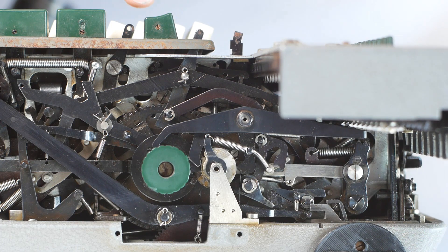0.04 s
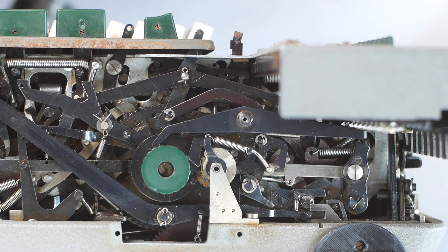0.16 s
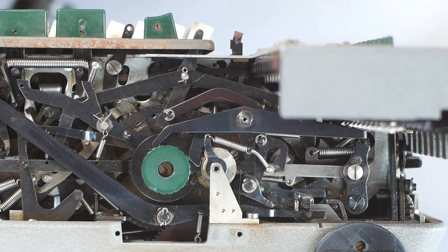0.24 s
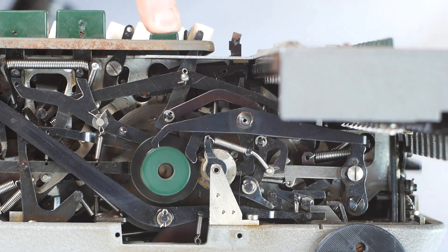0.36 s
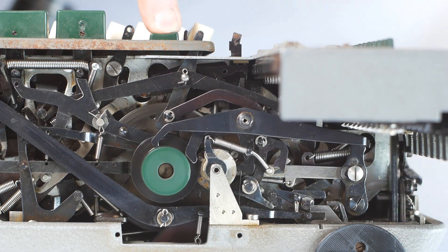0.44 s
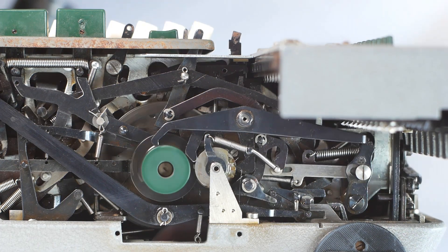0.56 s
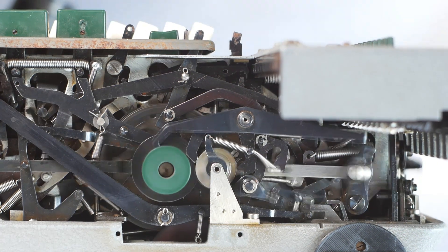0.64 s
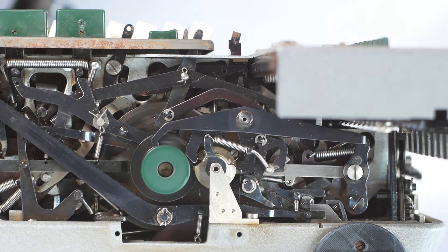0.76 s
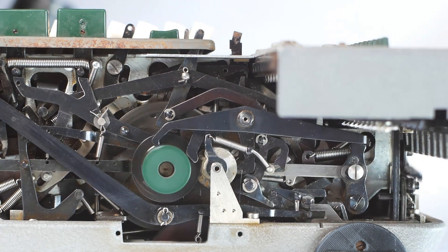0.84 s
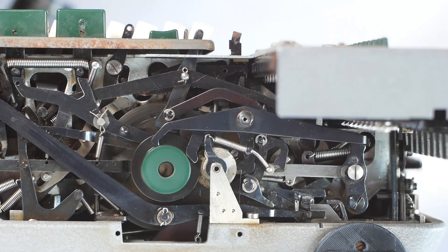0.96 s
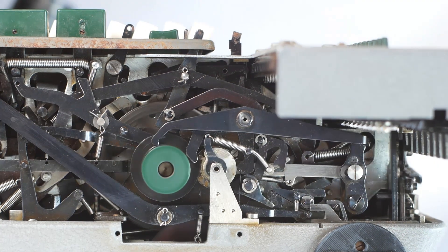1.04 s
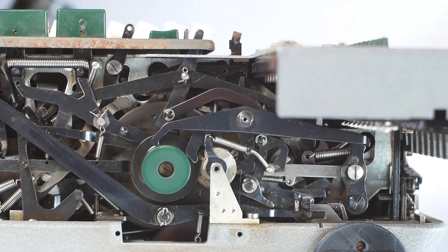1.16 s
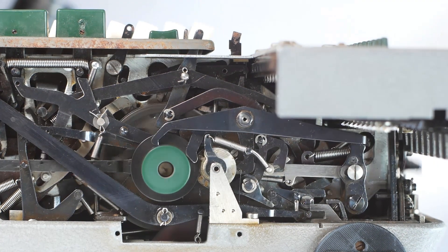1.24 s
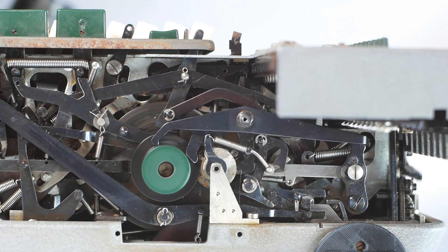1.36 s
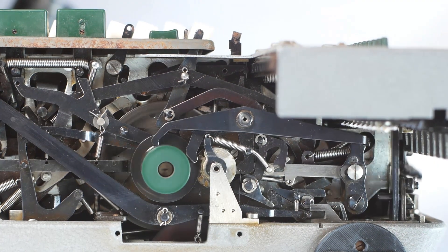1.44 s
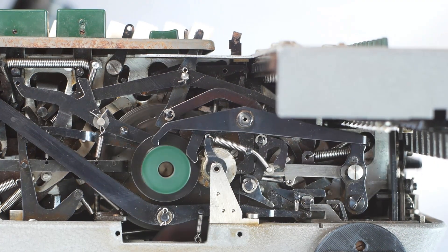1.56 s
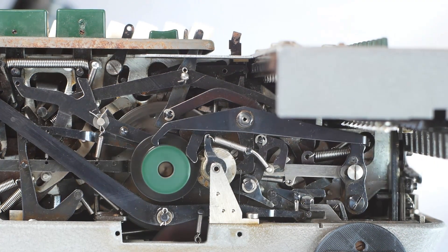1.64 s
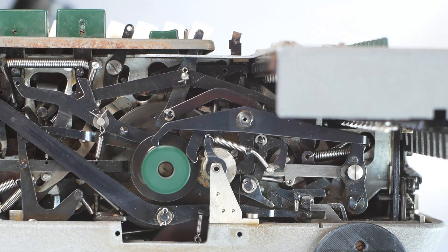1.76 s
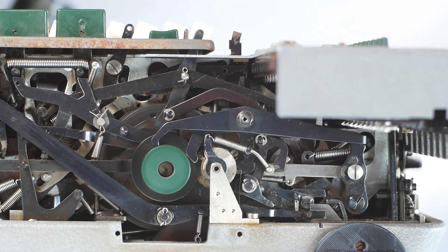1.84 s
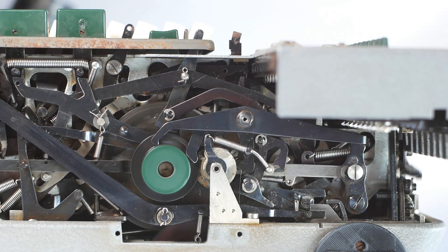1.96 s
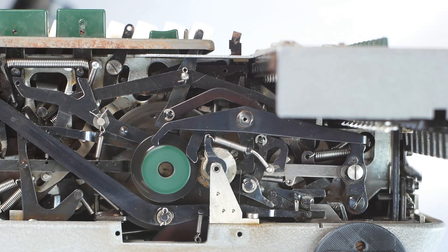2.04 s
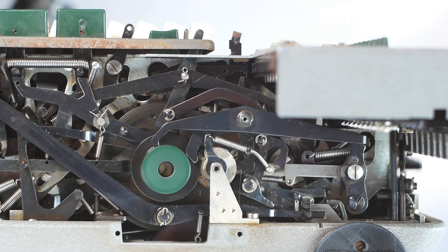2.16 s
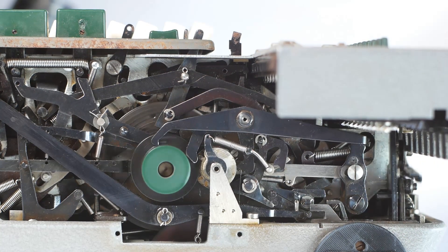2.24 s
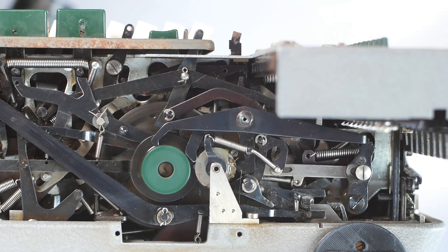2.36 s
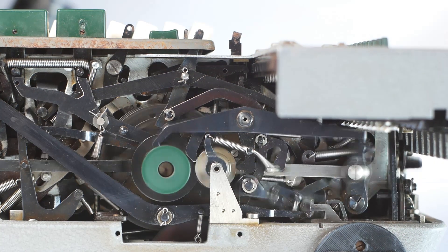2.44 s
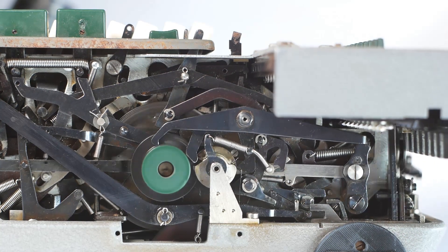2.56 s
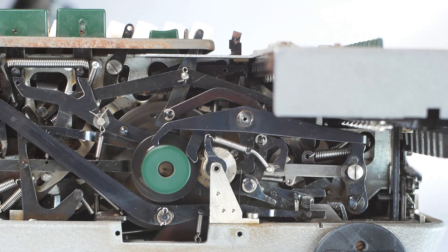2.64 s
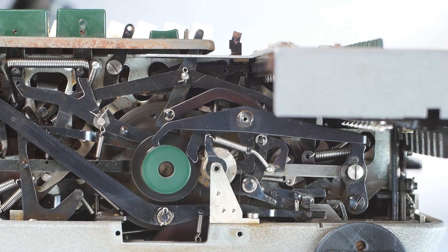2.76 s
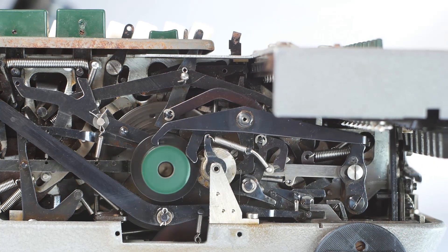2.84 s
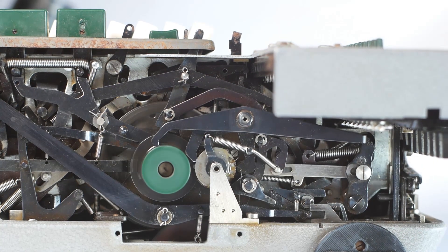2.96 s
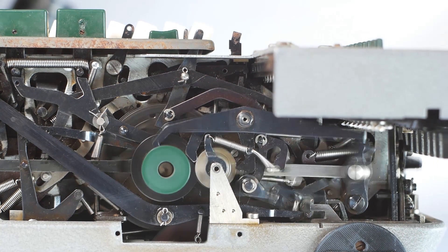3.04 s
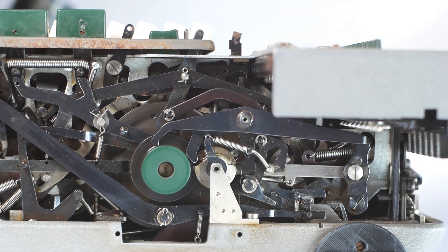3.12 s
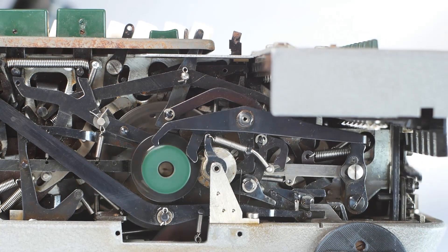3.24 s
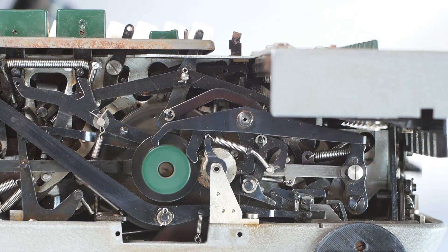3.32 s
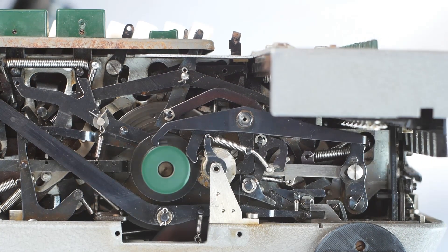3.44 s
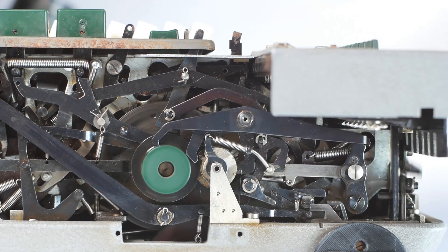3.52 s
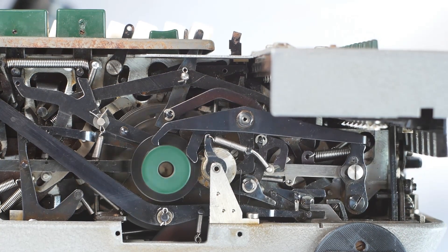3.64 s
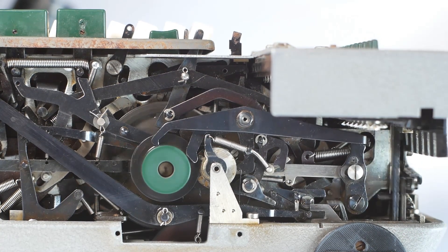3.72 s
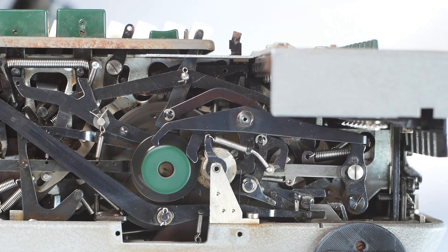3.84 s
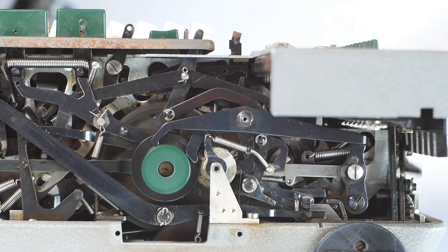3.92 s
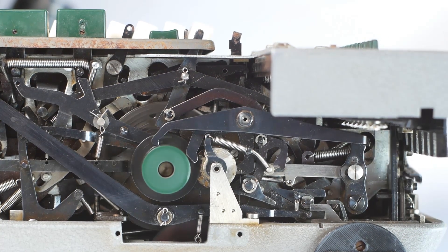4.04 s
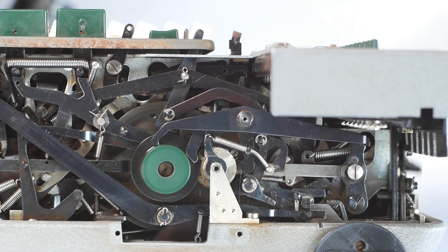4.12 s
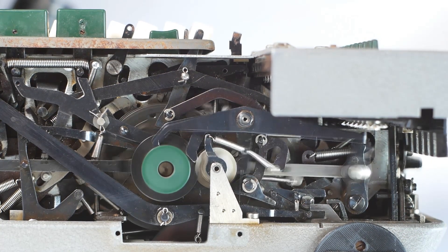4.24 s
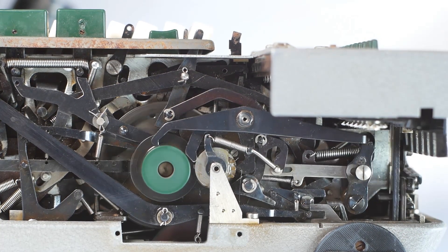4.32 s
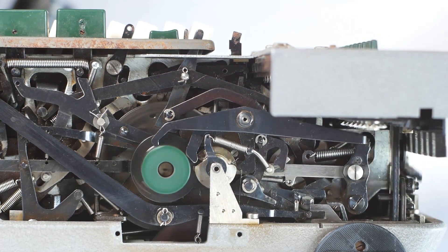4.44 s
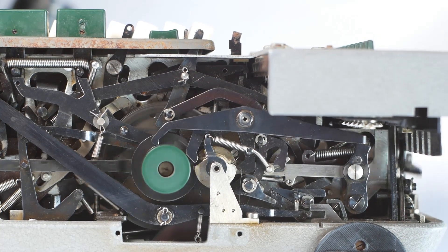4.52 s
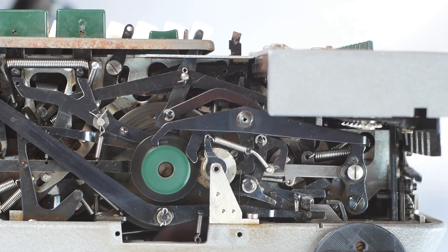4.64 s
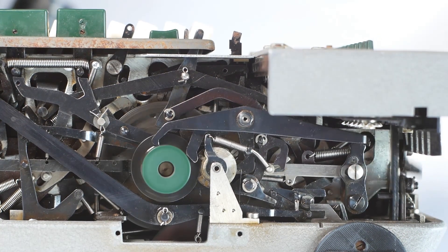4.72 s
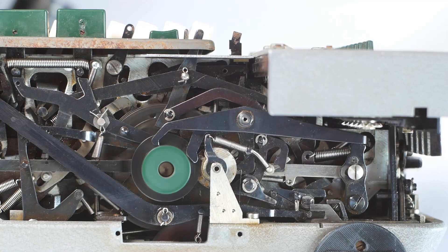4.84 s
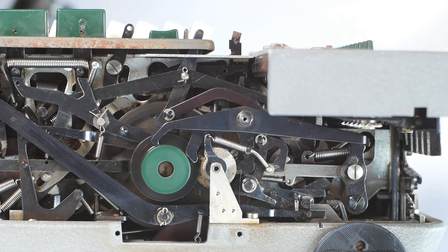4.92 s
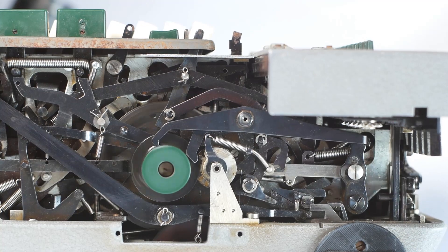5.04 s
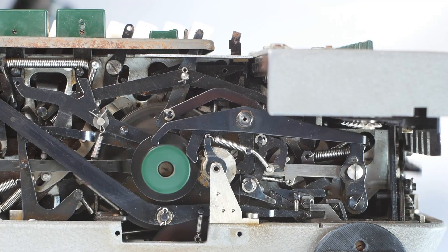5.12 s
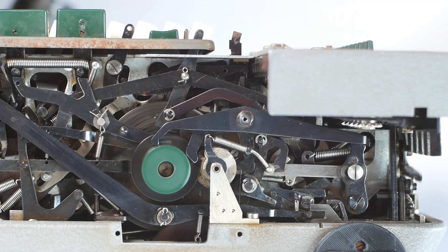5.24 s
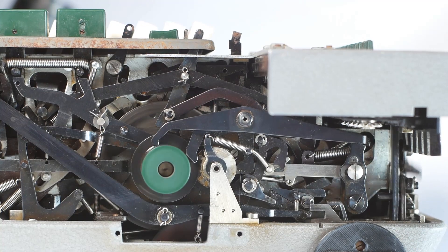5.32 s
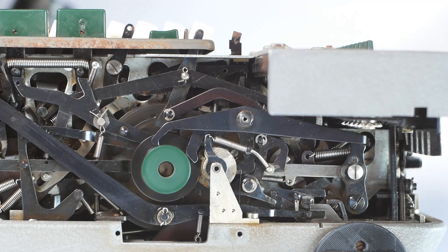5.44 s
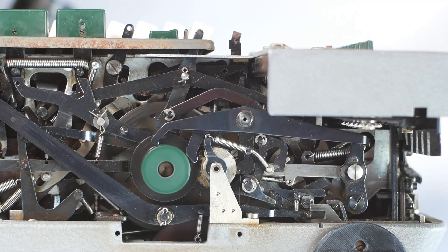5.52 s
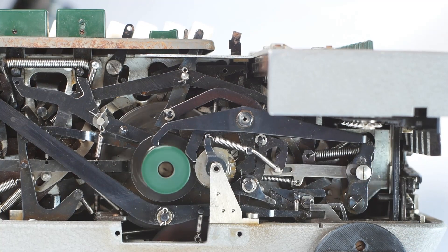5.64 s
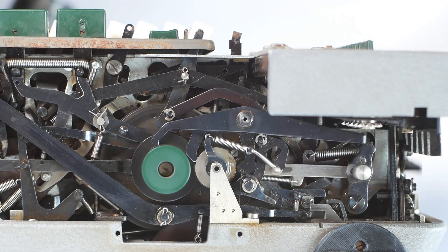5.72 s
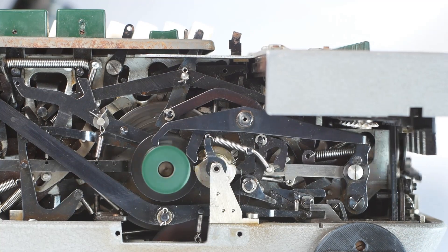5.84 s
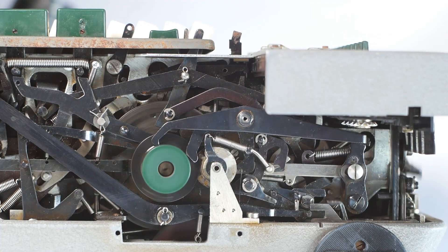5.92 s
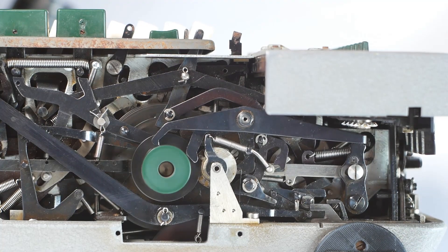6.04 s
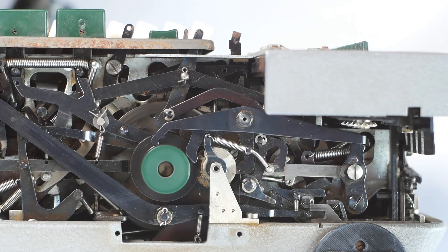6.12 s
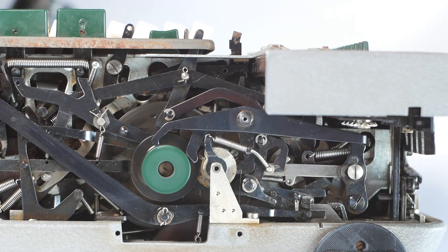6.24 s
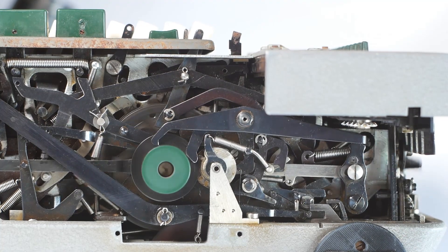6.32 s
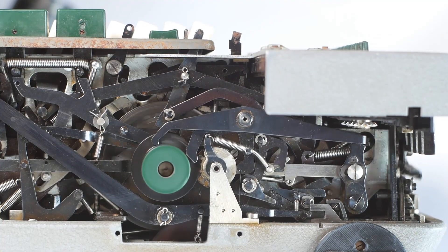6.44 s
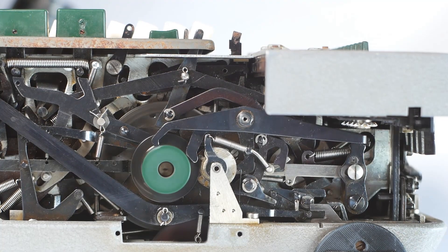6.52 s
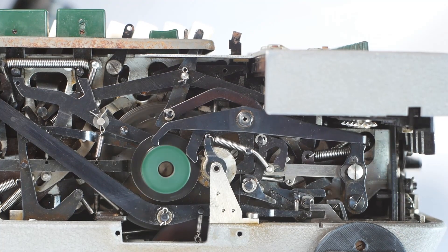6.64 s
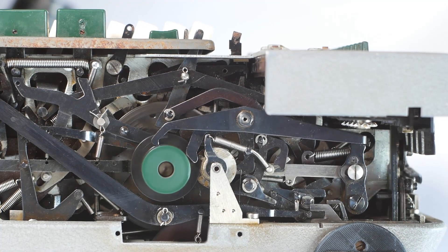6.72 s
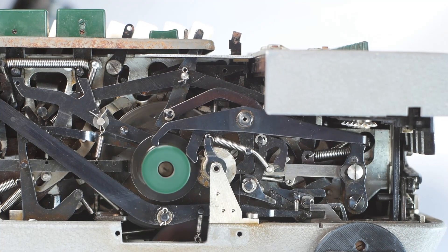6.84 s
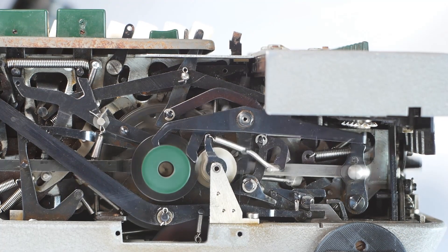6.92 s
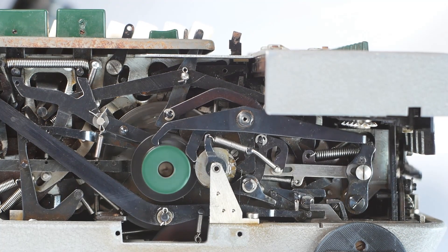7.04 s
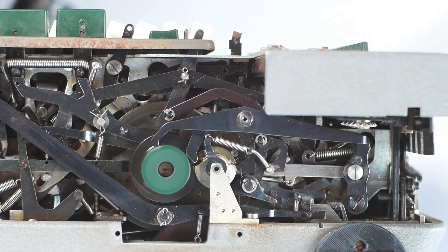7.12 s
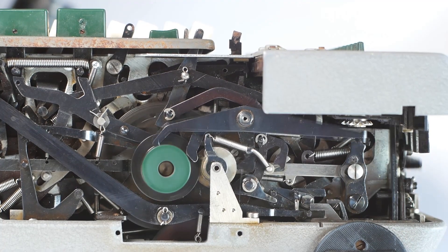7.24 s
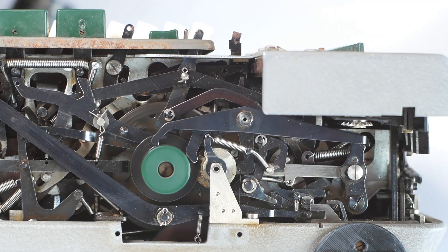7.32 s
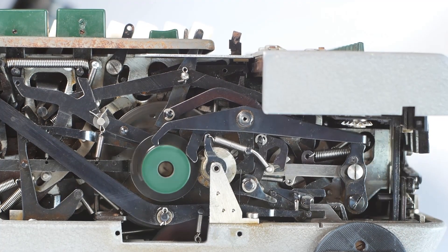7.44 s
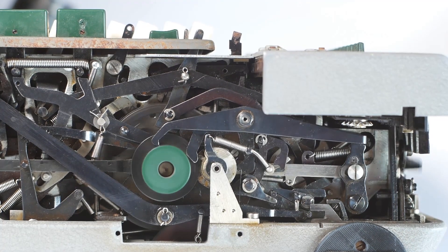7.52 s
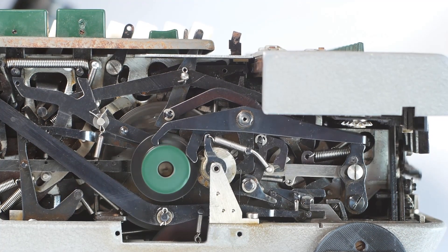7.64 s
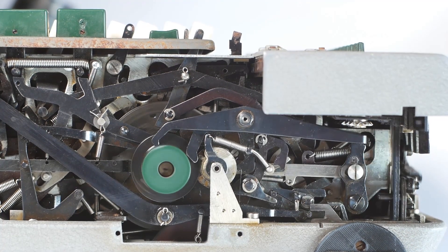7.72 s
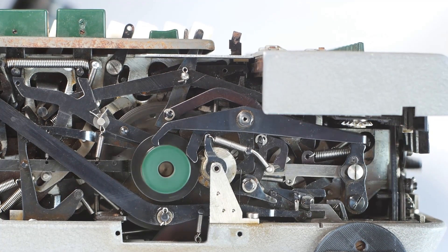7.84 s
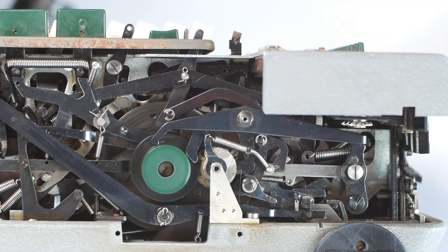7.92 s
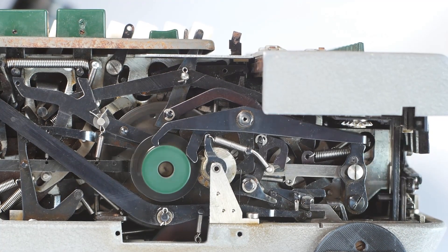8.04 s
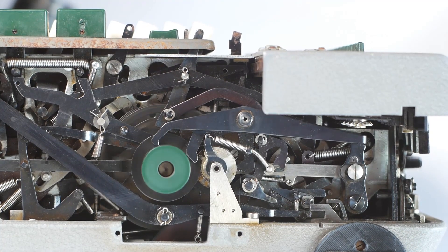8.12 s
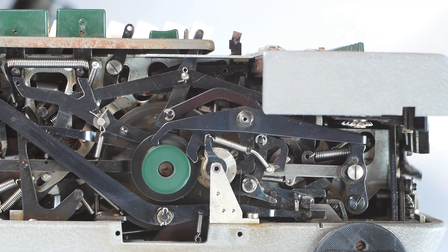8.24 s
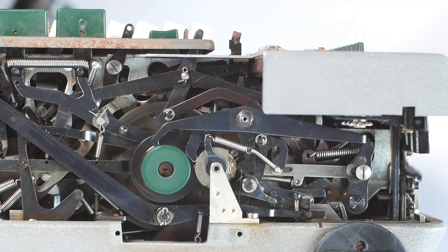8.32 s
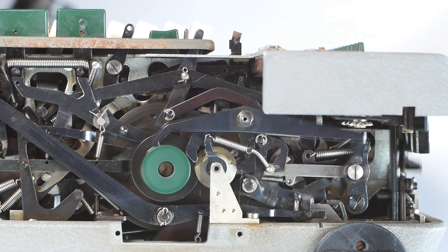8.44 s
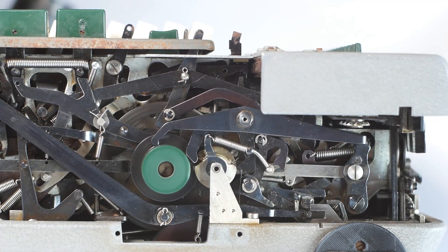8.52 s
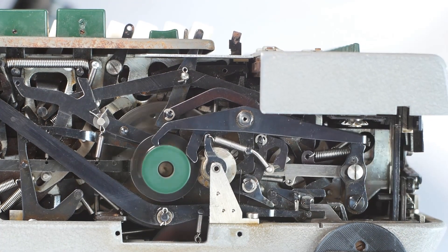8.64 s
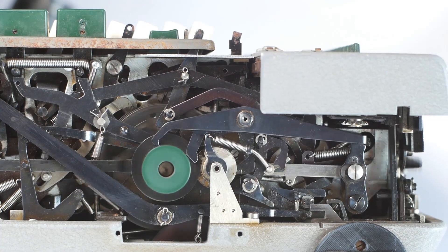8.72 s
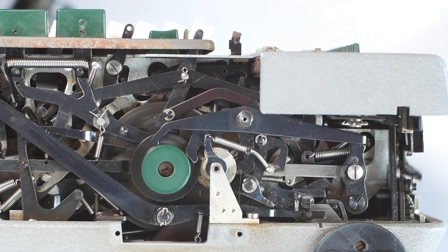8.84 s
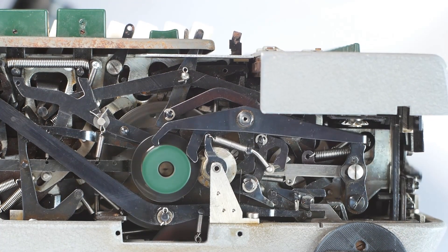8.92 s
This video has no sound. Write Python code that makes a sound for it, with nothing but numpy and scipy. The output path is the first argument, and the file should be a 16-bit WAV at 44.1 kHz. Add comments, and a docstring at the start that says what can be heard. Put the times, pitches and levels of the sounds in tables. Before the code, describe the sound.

A key is pressed on an open electromechanical calculator and its motor starts to whirr. Cams and steel levers clatter about seven times a second in bright, rattling clicks with short metallic rings. Roughly every second and a half the carriage clanks against its stop and latches with a tiny ratcheting click, then the clatter carries on. The stereo microphone is close, in a small quiet room.

```python
"""A small quiet room, close to a stereo microphone: a finger presses the key of an open calculator.
Its motor and gears whirr as many tiny contacts drive the resonances of the steel frame and levers.
About seven times a second cams, pawls and levers collide: each impact gives a bright rattle, a clack
and a thud, and struck parts ring in damped modes. At each shift the carriage clanks against its stop
and a spring finger clicks over teeth. Desk and walls add short reflections."""
import sys
import numpy as np
from scipy import signal
from scipy.fft import rfft, irfft, next_fast_len
from scipy.io import wavfile
from scipy.ndimage import uniform_filter1d

SR = 44100
rng = np.random.default_rng(int(sys.argv[2]) if len(sys.argv) > 2 else 0)


def wav_out(sig):
    """Save sig, one row per channel (or a flat mono array), as 16-bit PCM at SR to the path in sys.argv[1]."""
    wavfile.write(sys.argv[1], SR, np.round(np.clip(np.atleast_2d(sig).T, -1, 1) * 32767).astype(np.int16))


N = 395577

# Events of the mechanism. Each row: start in seconds, then rattle, clack and thud in relative dB.
STARTS = [(0.3824, -16, -33, -49), (0.4373, -20, -39.5, -38)]  # the key latches and the drive takes up
CLUTCHES = [(0.9424, -14.5, -35, -39.5), (2.1374, -16, -35, -42.5), (2.7347, -18.5, -37, -45),
            (3.3353, -16, -41, -42.5), (4.091, -16.5, -33, -40), (4.6842, -18.5, -39, -40.5),
            (5.4272, -15.5, -30.5, -38), (6.0287, -16, -38, -40), (6.77, -16.5, -36, -38),
            (7.3745, -18, -37, -45), (8.112, -14, -33, -40), (8.7178, -18.5, -37, -40)]  # the clutch bites at a digit's first turn and reverses at its last
WHEELS = [(1.1025, -18.5, -33, -44), (1.2538, -14.5, -30.5, -43), (1.396, -12.5, -27, -42),
          (1.5464, -10, -28, -40.5), (1.695, -9, -29.5, -43), (1.8424, -13.5, -27, -47),
          (1.9886, -12.5, -24, -44), (3.4894, -19, -37, -45), (3.6403, -20.5, -33, -42),
          (3.7983, -19, -30.5, -39), (3.944, -20, -34, -42), (4.8424, -16, -35, -41),
          (4.9907, -18, -32, -43), (5.1394, -16.5, -33, -42), (5.287, -17.5, -28.5, -42.5),
          (6.183, -17, -30, -47), (6.329, -16, -35, -49), (6.4757, -15.5, -30.5, -48),
          (6.6273, -18, -33, -46), (7.5328, -18.5, -35, -45), (7.6747, -18, -33, -40),
          (7.823, -15.5, -30, -42.5), (7.9754, -16.5, -32, -40), (8.88, -21, -38, -39)]  # number wheels spin up in the turns between
PAWLS = [(1, -14.5, -32, -43), (1.154, -9.5, -36, -49), (1.3061, -10, -34, -42), (1.4553, -11, -34, -41),
         (1.6056, -11.5, -39, -38), (1.7504, -9.5, -38, -38), (1.899, -12, -36, -45),
         (2.048, -13, -36, -55), (2.1993, -12.5, -33, -47), (2.796, -13.5, -32.5, -40),
         (3.395, -14, -42, -53), (3.544, -12, -37, -34), (3.693, -14, -33, -39), (3.8445, -10, -36, -46),
         (3.9966, -13, -33, -55), (4.1507, -13.5, -33, -36.5), (4.747, -16, -34, -41),
         (4.8964, -14, -36, -39), (5.0433, -12.5, -34, -34), (5.194, -10, -34, -35.5),
         (5.343, -13.5, -34, -39), (5.489, -10, -42, -42), (6.089, -13, -44, -36), (6.2335, -13, -35, -35),
         (6.3822, -13, -34, -38), (6.529, -11.5, -45, -55), (6.6802, -13.5, -34, -35),
         (6.833, -13, -46, -53), (7.431, -12, -42, -40), (7.583, -13, -33, -39), (7.729, -12.5, -36, -42),
         (7.878, -12.5, -38, -39), (8.029, -13.5, -29.5, -36.5), (8.176, -12, -35, -38),
         (8.779, -11.5, -46, -39), (8.934, -11.5, -39, -37)]  # the counter pawl drops once a turn
RETURNS = [(1.0364, -12, -40, -50), (1.1407, -15, -38, -41), (1.1864, -10, -42, -55), (1.34, -9, -32, -42),
           (1.3775, -17, -33, -37), (1.4884, -11, -32, -50), (1.6434, -16, -32, -46), (1.677, -9, -32, -29),
           (1.7777, -13, -38, -41), (1.822, -28, -35, -31), (1.933, -13, -38, -51), (2.0804, -26, -35, -52),
           (2.8284, -13, -37, -39), (2.883, -24, -43, -50), (3.476, -22, -33, -50), (3.62, -18, -36, -55),
           (3.704, -20, -36, -50), (3.7276, -10, -36, -39), (3.873, -9, -34, -52), (4.0304, -23, -40, -53),
           (4.778, -11, -33, -45), (4.9295, -14, -30, -45), (5.0744, -11, -31, -37), (5.224, -12, -37, -44),
           (5.374, -10, -28.5, -44), (5.5174, -9, -39, -40), (6.1244, -14, -31, -47),
           (6.267, -15, -41, -42), (6.4204, -19, -39, -37), (6.565, -12, -34, -51),
           (6.7176, -13, -30.5, -47), (7.537, -9, -30, -45), (7.6143, -9, -33, -37), (7.758, -10, -31, -38),
           (7.9125, -15, -38, -35.5), (8.0524, -11, -31, -45), (8.8103, -13, -37, -50),
           (8.9574, -18, -42, -38)]  # a loose lever knocks, mostly falling back after the pawl
ADD_BACKS = [(0.4967, -16, -29.5, -41.5), (2.2916, -15, -33, -40.5), (2.8953, -15.5, -30.5, -39),
             (4.2462, -14.5, -28, -41), (5.5817, -15.5, -32, -39), (6.9288, -16, -31.5, -40.5),
             (8.2782, -15, -31, -36.5)]  # the overdrawn amount is added back
SHIFTS = [(0.6414, -12.5, -33.5, -48), (2.4413, -13, -33, -44), (3.048, -14.5, -33, -50),
          (4.4022, -9.5, -33, -42.5), (5.7379, -11.5, -34, -39), (7.0815, -15, -33.5, -45),
          (8.4276, -12, -33, -53)]  # the carriage is released and slides one place
STOPS = [(0.6944, -14, -20.5, -36), (2.489, -13, -20.5, -38), (3.089, -13, -20.5, -34),
         (4.4434, -14.5, -21.5, -42), (5.783, -12.5, -22.5, -42), (7.1247, -12, -22, -36),
         (8.4694, -11.5, -21.5, -34)]  # it hits its stop
LATCHES = [(0.837, -15.5, -33.5, -48), (2.6326, -16, -36.5, -54), (3.2303, -15, -35.5, -51),
           (4.583, -15.5, -37.5, -39), (5.924, -18, -35, -43), (7.2665, -16.5, -34, -46),
           (8.613, -16, -33, -37.5)]  # it latches before the next digit
# The blows within one event of each kind. Each row: offset in seconds, then rattle, clack and thud
# in dB against the event, nominal 60 dB decay time in seconds.
START_BLOWS = [(-.0155, -17, -14, -27, .04), (-.008, -11, -3, -12, 0.22), (.006, -6, -2, -12, 0.05)]
CLUTCH_BLOWS = [(0, -3, 1.5, 3.5, 0.2), (0.031, -8.5, -1, -1, 0.14), (0.049, -13.5, -9, -7, .2)]
WHEEL_BLOWS = [(-.011, -9.5, -10, 0.5, 0.044), (0, -8, -3.5, 3, 0.27)]
PAWL_BLOWS = [(-.009, -15, 1.5, -1.5, 0.062), (-.0003, -3, -8.5, -5, 0.027), (.0012, -11, -8, -10, 0.075),
              (.007, -20.5, -13, -4.5, 0.25)]
RETURN_BLOWS = [(0.00013, -17.5, -0.08, 0, 0.084)]
ADD_BACK_BLOWS = [(-.016, -13.5, -5, -15, 0.08), (0, -3.5, 0, 4.5, 0.18), (0.028, -2, -4, 3.5, 0.16),
                  (.044, -3, -2, 4, 0.21), (.090, -4, -5, -27, .13), (0.124, -16.5, -40, -8.5, 0.75)]
SHIFT_BLOWS = [(0, -8.5, -0.57, 3.6, 0.23), (0.027, -10, -0.78, 8.1, 0.3)]
STOP_BLOWS = [(-.010, -11, -15, -2, 0.12), (.001, -3.5, -13, -4.5, 0.11), (.013, -7.5, -13, -1, .13)]
LATCH_BLOWS = [(-.048, -25, -5, -7.5, 0.48), (0, -6, 2, 2, 0.19), (0.013, -6, -12, -13, 0.27),
               (0.032, -25, -19, 6, .04)]
# Adding racks strike and the carriage bounces on its stop. Each row: start in seconds, peak in dB.
CLANKS = [(.5035, -20), (.5415, -19), (.6867, -18), (.6959, -14), (.6986, -18), (.7045, -20), (2.298, -21),
          (2.3362, -17), (2.338, -15), (2.3405, -19), (2.4816, -21), (2.4894, -14), (2.4931, -17),
          (2.4968, -13), (2.499, -17), (2.9379, -19), (2.9424, -16), (3.0886, -18), (3.0928, -7),
          (3.0962, -14), (3.1031, -20), (4.2884, -16), (4.2912, -21), (4.4335, -19), (4.4433, -16),
          (4.4465, -17), (4.4487, -15), (5.5847, -16), (5.6121, -19), (5.7671, -21), (5.7745, -21),
          (5.7835, -16), (5.7882, -18), (5.7904, -18), (6.9709, -17), (6.973, -19), (6.9801, -19),
          (7.11, -19), (7.1166, -18), (7.1272, -14), (7.1304, -16), (8.3205, -17), (8.3234, -16),
          (8.3269, -16), (8.4625, -21), (8.4729, -11), (8.4764, -15), (8.479, -17), (8.4847, -18)]
# Single modes that ring out. Each row: start in seconds, frequency in Hz, level in dB.
LEVER_RINGS = [(0.529, 3340, -34), (0.687, 2790, -29), (1.182, 2756, -34), (1.374, 2690, -34),
               (1.399, 2500, -30), (1.549, 2580, -35), (1.636, 2730, -41), (1.694, 2070, -39),
               (1.818, 2760, -35), (1.97, 2720, -39), (1.998, 2660, -45), (2.135, 2440, -31),
               (2.136, 1830, -29.5), (2.287, 2700, -39), (2.292, 4400, -37), (2.327, 2090, -35),
               (2.33, 2320, -34), (2.482, 2010, -29.5), (2.487, 1003, -36), (2.893, 2670, -40),
               (2.936, 2540, -36), (2.938, 2920, -35), (3.094, 3740, -36), (3.642, 2770, -37),
               (3.828, 2600, -34), (4.086, 2460, -30), (4.096, 1696, -30), (4.27, 2060, -40),
               (4.42, 1706, -34), (4.43, 3420, -32), (4.432, 3930, -37), (4.924, 1810, -35),
               (4.929, 2636, -34), (5.286, 2820, -33), (5.602, 2550, -38), (5.607, 2040, -30),
               (5.777, 3110, -28), (5.782, 2080, -40), (5.785, 2540, -39), (6.112, 2740, -35),
               (6.181, 2740, -32), (6.416, 2720, -36), (6.458, 2730, -35), (6.485, 4340, -36),
               (6.484, 2760, -42), (6.631, 2680, -34), (6.68, 2720, -33), (6.707, 2720, -40),
               (6.77, 2760, -38), (6.959, 3980, -34), (6.967, 2110, -32), (7.121, 2070, -30),
               (7.246, 2670, -35), (7.378, 2780, -38), (7.531, 1680, -35), (7.535, 2060, -37),
               (7.659, 2700, -39), (7.777, 2710, -36), (7.942, 2700, -30.5), (8.117, 2800, -37),
               (8.271, 2670, -55), (8.319, 2310, -36), (8.362, 2700, -35), (8.461, 3700, -28),
               (8.605, 2680, -37), (8.803, 2740, -36), (8.91, 2710, -33)]
FRAME_KNOCKS = [(0.403, 509, -37), (.417, 492, -33.5), (.454, 493, -36), (.5, 513, -37), (1.265, 490, -37),
                (1.3, 497, -43), (1.571, 500, -38), (1.973, 503, -34), (2.138, 520, -39), (2.335, 654, -37),
                (2.345, 825, -46), (2.938, 634, -38), (2.95, 810, -43), (3.804, 496, -37),
                (3.829, 503, -39), (4.29, 620, -38), (4.3, 820, -40), (4.445, 634, -41), (5.635, 620, -36),
                (5.672, 465, -45), (5.78, 616, -44), (6.188, 489, -35), (6.488, 498, -38),
                (6.977, 634, -34), (8.284, 490, -40), (8.325, 601, -34), (8.363, 490, -35),
                (8.76, 510, -34)]
# A spring finger skips over four teeth as the carriage latches.
# Each row: start in seconds, time between teeth in seconds, nominal peak in dB.
RATCHETS = [(0.837, 0.0057, -9.5), (2.632, 0.0046, -9.5), (3.232, 0.0047, -11), (4.5852, 0.0055, -9),
            (5.9256, 0.0045, -8.5), (7.268, 0.0042, -9.5), (8.616, 0.0043, -10)]
TEETH_DB = [-3, -2, -3, -3]  # each entry: one tooth's offset in dB
# The spring finger snaps as the carriage is released. Each row: start in seconds, nominal peak in dB.
SNAPS = [(0.6426, -16), (3.0502, -9), (4.4032, -20), (5.741, -12), (7.0823, -13), (8.4312, -18)]
# Motor and gears. Each row: time in seconds, then tooth hiss, low hum, frame drone and lever ringing
# in relative dB.
WHIRR_LEVELS = [(.349, -39, -72, -77, -81), (.364, -44, -73, -78, -63), (.378, -35, -57, -57, -52),
                (0.404, -28, -55, -44, -39), (.5, -32.5, -57, -51, -65), (.7, -32, -52, -45, -43.5),
                (1.3, -32.5, -57, -52.5, -42), (2.3, -30.5, -49, -45, -41.5),
                (3.7, -32, -52.5, -49.5, -42.5), (4.4, -31.5, -54, -49, -42), (6.399, -31, -55, -47.5, -41),
                (7.3, -31.5, -51.5, -46.5, -41), (8.97, -32, -53, -52.5, -41.5)]
# Finger on the key. Each row: start in seconds, frequency and bandwidth in Hz, level in dB,
# 60 dB decay time in seconds.
KEY_TOUCHES = [(.054, 3860, 260, -66, 0.15), (.07, 800, 50, -64, 0.5), (.135, 810, 60, -62, .3)]

# Resonances of the steel parts. Each row: frequency in Hz, bandwidth in Hz, relative level in dB.
FRAME_MODES = [(170, 26, -2), (259, 14, 1.5), (356, 30, -7), (394, 28, -3), (500, 28, 0), (646, 48, -1),
               (820, 42, -3), (1036, 55, -4)]
LEVER_MODES = [(1312, 40, -3), (1390, 40, -2), (1690, 70, -3), (1815, 50, -2), (1902, 45, 0),
               (2080, 110, -2), (2225, 90, 0), (2735, 105, 4), (3070, 90, -4), (4330, 200, -5)]
CARRIAGE_MODES = [(1720, 220, -7), (2100, 230, 0), (2350, 260, -1), (2650, 260, -1), (3050, 280, -1),
                  (3750, 260, -3)]
PAWL_MODES = [(3260, 200, 1), (4580, 180, -3), (5300, 200, 2), (5700, 200, 1)]
SPRING_MODES = [(9600, 500, 0), (11200, 600, 0), (13000, 700, -9), (6500, 900, -9)]
# Spectral envelopes. Each row: frequency in Hz, relative level in dB.
RATTLE_SPECTRUM = [(1500, -51), (3500, -8), (5000, -3), (7000, -2.5), (9000, 4.5), (10500, 5.5),
                   (12500, -8), (15000, -15), (16500, -35)]
CLACK_SPECTRUM = [(500, -22.5), (1000, -3.5), (2200, 4), (2900, 2.5), (3600, -7), (6000, -30)]
GEAR_SPECTRUM = [(40, 4), (310, -9.5), (600, -5), (710, -3), (850, 1.5), (1200, 0.5), (2700, 3),
                 (3560, -0.5), (7900, 1), (9700, 6.5), (14100, -15), (16000, -26)]
SIDE_SPECTRUM = [(60, 0), (140, 7), (230, -3), (600, -9.5), (1300, -8.5), (2400, -13.5), (8000, -10),
                 (15000, -5)]  # reflections in the stereo side signal
AIR_SPECTRUM = [(30, 7), (200, 1.5), (850, -3), (2450, -4), (2620, 1), (2900, -11.5), (10000, -18.5),
                (16000, -30)]


def mechanism():
    """Impact excitation: one shower of contacts drives small parts, levers, frame and desk."""
    shower = contacts(per_s=6000, spread_db=2.0)
    hard = np.array([round(s * SR) for s, *_, t60 in all_blows() if t60 < .07])
    shower[hard], shower[hard + 2] = 2.0, -1.8  # steel meets steel and rebounds: a bright tick
    shake = shower * blow_envelope("rattle", rise_s=0.001, linger=0.73)
    push = shower * blow_envelope("clack", rise_s=0.0015, linger=0.93)
    jolt = shower * blow_envelope("thud", rise_s=0.0027, linger=1.0)
    rattle = gain_of(-3) * coloured(shake, RATTLE_SPECTRUM)
    clack = gain_of(-1) * coloured(push, CLACK_SPECTRUM) + gain_of(-28) * resonate(push, LEVER_MODES)
    desk = signal.lfilter(*signal.butter(1, 240, fs=SR), jolt)  # the desk top yields with a dull bump
    thud = gain_of(-1) * resonate(jolt, FRAME_MODES[2:]) + gain_of(3.5) * desk
    return rattle + clack + gain_of(-16) * lever_pings() + thud


def all_blows():
    """Each event is a series of impacts, given as start in seconds, levels in dB, decay in seconds."""
    kinds = [(STARTS, START_BLOWS), (CLUTCHES, CLUTCH_BLOWS), (WHEELS, WHEEL_BLOWS),
             (PAWLS, PAWL_BLOWS), (RETURNS, RETURN_BLOWS), (ADD_BACKS, ADD_BACK_BLOWS),
             (SHIFTS, SHIFT_BLOWS), (STOPS, STOP_BLOWS), (LATCHES, LATCH_BLOWS)]
    return [(s + offset, dict(zip(("rattle", "clack", "thud"), np.add(event_db, blow_db))), t60)
            for events, blows in kinds
            for s, *event_db in events
            for offset, *blow_db, t60 in blows]


def blow_envelope(layer, rise_s, linger):
    """Incoherent sources add in power: vibration builds up to each blow, then decays exponentially."""
    power, lead = np.zeros(N + SR), 400
    for s, levels_db, nominal_t60 in all_blows():
        t60 = np.clip(nominal_t60 * linger, .01, .5)
        t = np.arange(-lead, round(t60 * SR)) / SR
        envelope = np.where(t < 0, np.exp(t / rise_s), gain_of(-60 * t / t60))
        power[round(s * SR) - lead:][:len(t)] += (gain_of(levels_db[layer]) * envelope) ** 2
    return np.sqrt(power[:N])


def lever_pings():
    """The point of impact sets the modal balance, so each blow rings the levers in its own mix."""
    t, out = np.arange(3000) / SR, np.zeros(N + 3000)
    for s, levels_db, _ in all_blows():
        mix, detune = rng.standard_normal((2, len(LEVER_MODES)))
        ring = sum(gain_of(db + 2.0 * m) * damped_sine(t, hz * (1 + 0.039 * d), width)
                   for (hz, width, db), m, d in zip(LEVER_MODES, mix, detune))
        out[round(s * SR):][:len(t)] += gain_of(levels_db["clack"]) * ring
    return out[:N]


def struck_parts():
    """Free vibration after impact: the carriage clanks, the pawl pings, levers and frame ring out."""
    sounds = [(s, gain_of(db) * strike(CARRIAGE_MODES, spread_db=3.5)) for s, db in CLANKS]
    sounds += [(s, gain_of(db - 13.5) * strike(PAWL_MODES, spread_db=3.0)) for s, db, *_ in PAWLS]
    sounds += [(s, gain_of(db) * loose_mode(hz, rise_s=.0037, t60=.11, looseness=.35))
               for s, hz, db in LEVER_RINGS]
    sounds += [(s, gain_of(db) * loose_mode(hz, rise_s=.006, t60=.17, looseness=.15))
               for s, hz, db in FRAME_KNOCKS]
    out = np.zeros(N + SR)
    for s, sound in sounds:
        out[round(s * SR):][:len(sound)] += sound
    return out[:N]


def strike(modes, spread_db):
    """Modal superposition: one blow excites damped modes in a random mix; peak 1."""
    t = np.arange(2000) / SR
    ring = sum(gain_of(db + spread_db * rng.standard_normal())
               * damped_sine(t, hz * rng.uniform(.98, 1.02), width) for hz, width, db in modes)
    ring *= 1 - np.exp(-t / .00025)  # a soft first cycle
    return ring / abs(ring).max()


def loose_mode(hz, rise_s, t60, looseness):
    """A chattering mount modulates the amplitude and phase of one mode as it swells and decays."""
    t = np.arange(6000) / SR
    fade = (1 - np.exp(-t / rise_s)) * gain_of(-60 * t / t60)
    flutter, jitter = looseness * unit_rms(uniform_filter1d(rng.standard_normal((2, len(t))), 260))
    phase = 2 * np.pi * (hz * t + rng.random()) + jitter
    return fade / fade.max() * (1 + .5 * flutter) * np.sin(phase)


def ratchet():
    """Heavily damped high modes make the spring finger click, in an even run or a single snap."""
    t, out = np.arange(400) / SR, np.zeros(N)
    teeth = [(s + k * gap, db + tooth_db)
             for s, gap, db in RATCHETS for k, tooth_db in enumerate(TEETH_DB)]
    for s, db in teeth + SNAPS:
        click = sum(gain_of(mode_db) * width * t * damped_sine(t, hz * rng.uniform(1, 1.05), 2 * width)
                    for hz, width, mode_db in SPRING_MODES)
        click /= abs(click).max()
        out[round(s * SR):][:len(t)] += gain_of(db + 2 * rng.standard_normal()) * click
    return out


def motor():
    """Forced vibration: gear teeth and brushes hiss and shake the frame; loose knocks ring the levers."""
    t = np.arange(N) / SR
    times, *levels_db = np.transpose(WHIRR_LEVELS)
    switched_on = t > times[0]
    hiss, hum, drone, ringing = (gain_of(np.interp(t, times, db)) * switched_on for db in levels_db)
    teeth = contacts(per_s=7000, spread_db=3.0)
    knocks = contacts(per_s=380, spread_db=3.2)
    bumps = contacts(per_s=520, spread_db=2.5)
    load = uniform_filter1d(blow_envelope("rattle", rise_s=0.0053, linger=0.98), 500)
    load /= load.mean()  # teeth press harder while the mechanism works
    gears = coloured(teeth * hiss * (0.5 + 0.5 * np.sqrt(load)), GEAR_SPECTRUM)
    frame_hum = resonate(bumps * hum * (0.44 + 0.23 * load), FRAME_MODES[:2])
    frame_drone = resonate(teeth * drone * (0.72 + 0.29 * load), FRAME_MODES[2:7])
    return gears + frame_hum + frame_drone + resonate(knocks * ringing, LEVER_MODES)


def key_touch():
    """Decaying noise drives single resonances: a light scuff and ring as the finger meets the key."""
    t, out = np.arange(N) / SR, np.zeros(N)
    for s, hz, width, db, t60 in KEY_TOUCHES:
        fade = gain_of(db - 60 * (t - s) / t60) * (t > s)
        out += resonate(rng.standard_normal(N) * fade, [(hz, width, 0)])
    return out


def reflections(x, t60):
    """Four sparse, short echo patterns crossfade at a steady rate, keeping the room sound diffuse."""
    t, out = np.arange(SR // 4) / SR, np.zeros(N)
    turn = np.arange(N) / SR * 9.3 % 4
    for k in range(4):
        taps = rng.choice([-1., 1.], len(t)) * (rng.random(len(t)) < 2000 / SR)
        taps *= gain_of(-60 * t / t60) * (t > .0007)
        turns_away = abs((turn - k + 2) % 4 - 2)
        crossfade = np.cos(np.pi / 2 * np.minimum(turns_away, 1))
        out += convolved(x * crossfade, taps)
    return out


def room_air():
    """Faint room noise wavers a little and is only partly correlated between the two channels."""
    wobble = unit_rms(uniform_filter1d(rng.standard_normal(N), 900))
    mid, side = (coloured(rng.standard_normal(N), AIR_SPECTRUM) for _ in range(2))
    return gain_of(-62.5 + 0.83 * wobble) * np.array([mid + 1.2 * side, mid - 1.2 * side])


def contacts(per_s, spread_db):
    """Shot noise: tiny metal contacts at random moments, most small, a few large; rms 1."""
    size = gain_of(spread_db * np.minimum(rng.exponential(1, N), 4)) * rng.choice([-1., 1.], N)
    return unit_rms(size * (rng.random(N) < per_s / SR))


def damped_sine(t, hz, width):
    """A free mode decays at a rate proportional to its bandwidth in Hz."""
    return np.exp(-np.pi * width * t) * np.sin(2 * np.pi * hz * t)


def resonate(x, modes):
    """Resonance: modes driven by x build up over a few cycles and die away."""
    t = np.arange(4096) / SR
    taps = sum(gain_of(db) * width ** 1.5 * t * damped_sine(t, hz, 1.5 * width)
               for hz, width, db in modes)
    return convolved(x, taps)


def coloured(x, spectrum):
    """A minimum-phase filter imposes the spectral envelope causally."""
    log_gain = np.log(gain_at(spectrum, abs(np.fft.fftfreq(4096, 1 / SR))))
    taps = np.fft.ifft(np.exp(np.conj(signal.hilbert(log_gain)))).real[:2048]
    return convolved(x, taps)


def equalised(x, spectrum):
    """A zero-phase filter scales each frequency of x."""
    size = next_fast_len(N)
    return irfft(rfft(x, size) * gain_at(spectrum, np.fft.rfftfreq(size, 1 / SR)), size)[:N]


def convolved(x, taps):
    """Convolution with an impulse response scaled to energy 1."""
    return signal.oaconvolve(x, taps / np.linalg.norm(taps))[:N]


def gain_at(spectrum, hz):
    """Amplitude ratio from a dB curve interpolated over log frequency."""
    points_hz, db = np.transpose(spectrum)
    return gain_of(np.interp(np.log(hz + 1), np.log(points_hz + 1), db))


def gain_of(db):
    """Decibels to amplitude ratio."""
    return 10 ** (np.asarray(db) / 20)


def unit_rms(x):
    """Normalises to mean power 1."""
    return x / np.sqrt(np.mean(x ** 2) + 1e-20)


def scene():
    """Superposition of direct sound, desk and wall reflections and room noise, as mid and side."""
    machine = mechanism() + struck_parts() + ratchet() + motor() + key_touch()
    mid = machine + gain_of(-11) * reflections(machine, t60=0.09)
    side = equalised(reflections(machine, t60=0.074), SIDE_SPECTRUM)
    left = gain_of(.6) * (mid + side)  # the machine stands a little left
    return np.array([left, mid - side]) + room_air()


def record(dry):
    """Linear filtering shapes the tone: thin bass, a narrow dip near 7850 Hz, no treble above 16 kHz."""
    bass_hz, notch_hz, edge_hz = 260, 7850, 16200
    thin = signal.sosfilt(signal.butter(2, bass_hz, "high", fs=SR, output="sos"), dry)
    dipped = 0.18 * thin + 0.65 * signal.lfilter(*signal.iirnotch(notch_hz, 45, SR), thin)
    band_limit = signal.firwin(511, edge_hz, window=("kaiser", 9), fs=SR)
    return signal.oaconvolve(dipped, band_limit[None], "same")


dry = scene()
out = record(dry)
wav_out(out)
```